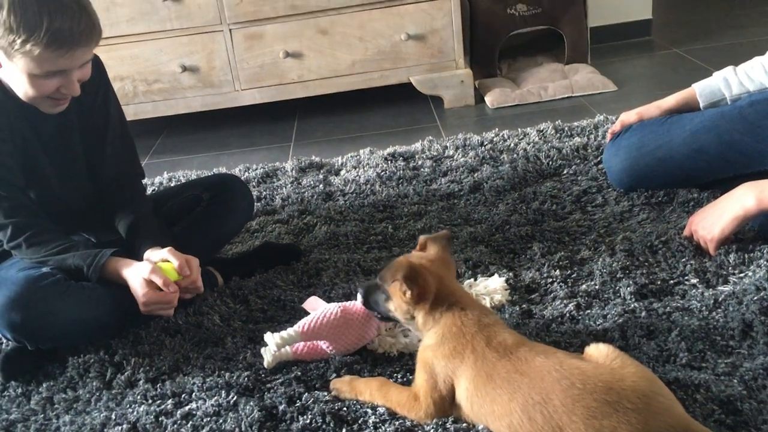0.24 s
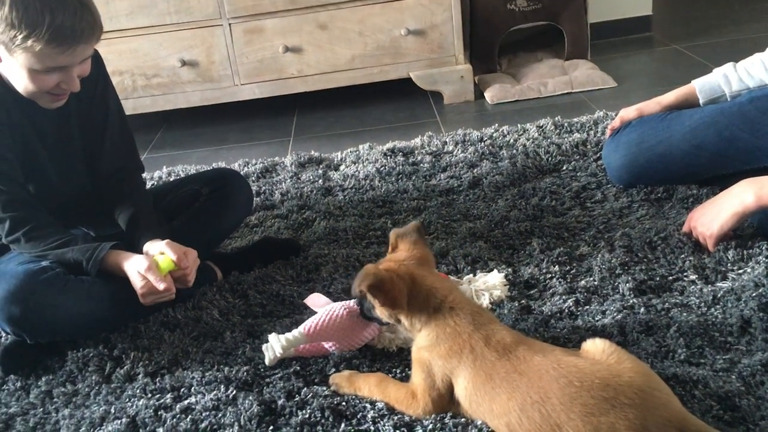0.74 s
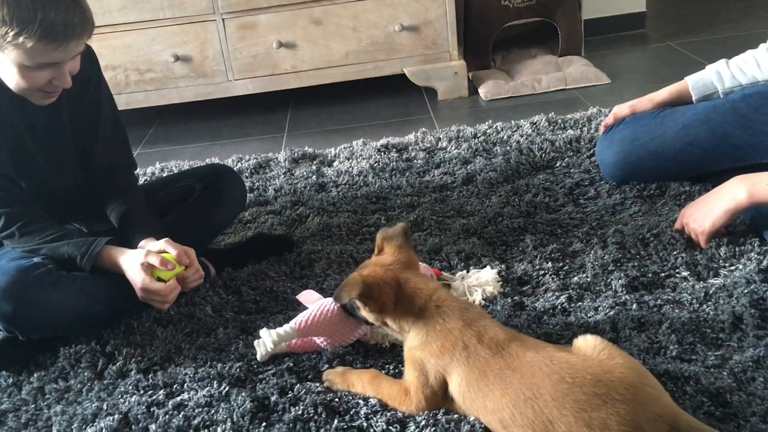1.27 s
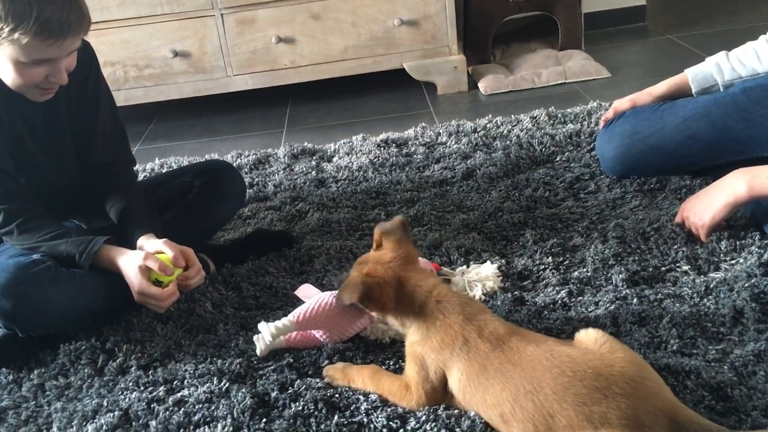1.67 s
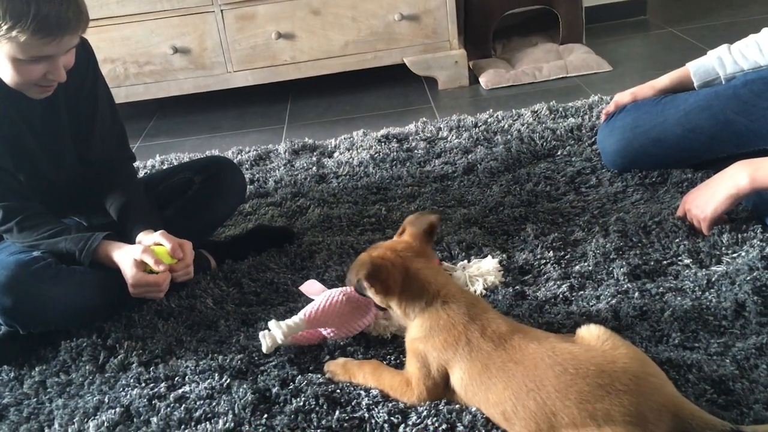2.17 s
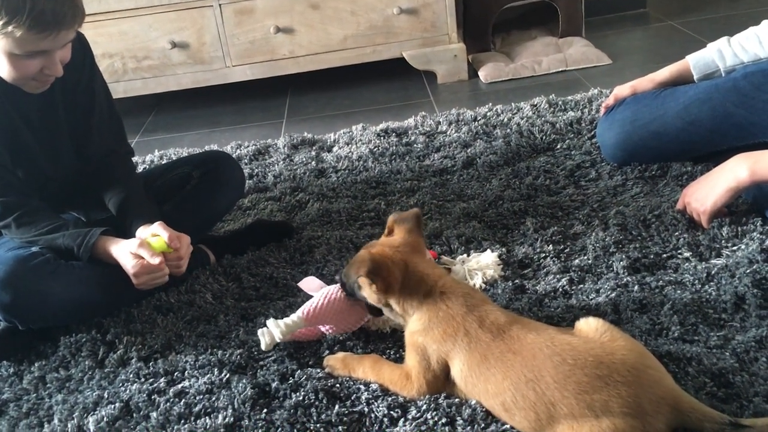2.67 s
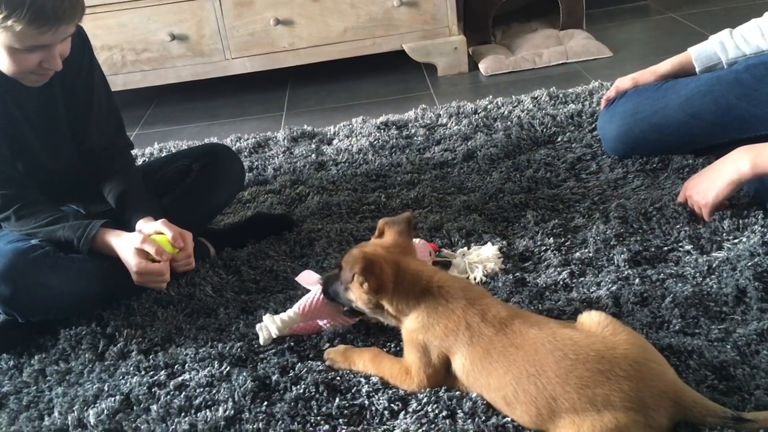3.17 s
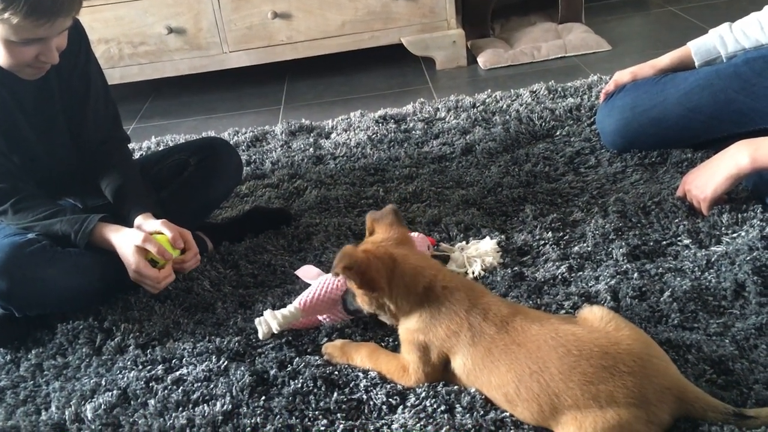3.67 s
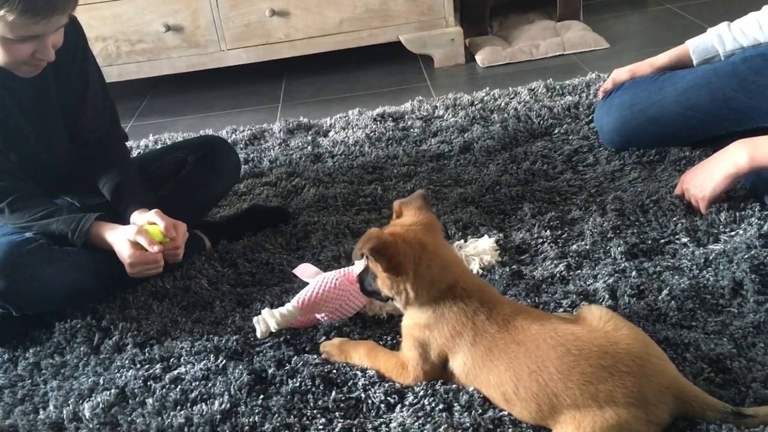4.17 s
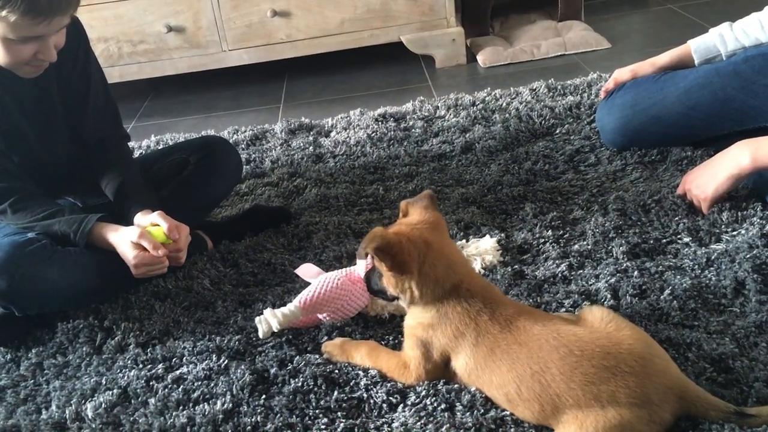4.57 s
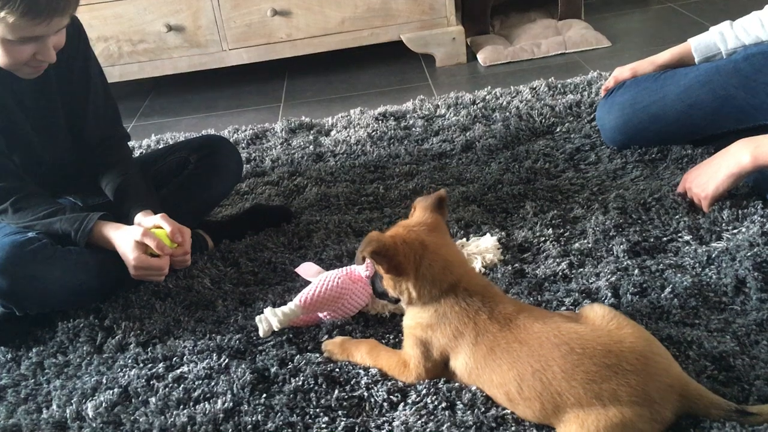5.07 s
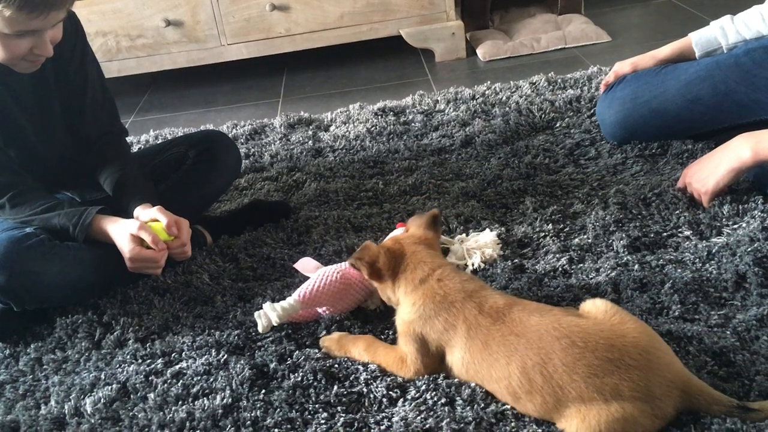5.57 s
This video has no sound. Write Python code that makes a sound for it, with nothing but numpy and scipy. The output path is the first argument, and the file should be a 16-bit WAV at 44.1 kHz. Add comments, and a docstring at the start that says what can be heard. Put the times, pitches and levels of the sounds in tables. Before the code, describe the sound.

A rubber squeaker ball is squeezed by hand six times, giving short bright squeaks with airy hisses over a steady low hum indoors.

```python
"""A living room with a rug, where a rubber squeaker ball is squeezed by hand six times.
Its reed starts with a chirp, locks into a bright squeak near 1.2 kHz and sags in pitch as the squeeze ends:
a stack of gliding overtones plus turbulence, with room reflections and a diffuse tail.
Around the squeaks, coloured noise makes the air hissing through the silent reed; two faint ticks are heard.
A steady mains hum and dull room noise lie under everything."""
import sys
import numpy as np
from scipy import signal
from scipy.fft import rfft, irfft, next_fast_len
from scipy.io import wavfile
from scipy.ndimage import map_coordinates

SR = 44100
rng = np.random.default_rng(int(sys.argv[2]) if len(sys.argv) > 2 else 0)


def waveform_to_disk(signal):
    """Save audio, clipped to [-1, 1], as 16-bit WAV at the path in sys.argv[1]."""
    frames = np.transpose(np.atleast_2d(signal))
    scaled = np.clip(frames, -1, 1) * 32767
    samples = np.round(scaled).astype(np.int16)
    wavfile.write(sys.argv[1], SR, samples)


N = 256662
TIME = np.arange(N) / SR

# The six squeezes of the hand on the ball.
# Each row: start, rise, hold and sag in seconds, the reed's free note, first pitch and top pitch in Hz,
# level in dB before the mix, brightness in dB (upper against lower overtones),
# then the notch cut by the cupped hands: centre in Hz, width in Hz, depth in dB.
SQUEEZES = [(1.229, 0.21, 0.0014, .021, 1932, 1235, 1278, -29, 0.5, 6900, 1400, 16),
            (2.357, 0.048, 0.0043, .075, 1714, 1203, 1229, -27, 4.5, 6600, 916, 1.5),
            (3.53, 0.0079, 0.0043, 0.02, 1920, 1204, 1248, -30, 4, 6800, 1780, 17),
            (3.948, 0.013, 0.0025, .092, 1762, 1209, 1239, -26, 5, 6400, 1102, 6.5),
            (4.172, 0.023, .103, 0.088, 1625, 1180, 1207, -28, 1.9, 2080, 1093, 4.5),
            (5.31, 0.027, .009, .043, 1675, 1205, 1244, -26.5, 4, 10300, 1800, 4.5)]


def amp(db):
    """Decibels to an amplitude factor."""
    return 10 ** (np.asarray(db) / 20)


def unit(x):
    """x brought to rms 1."""
    return x / np.sqrt(np.mean(x ** 2) + 1e-20)


def along(points, hz):
    """Read a curve of (Hz, value) points on a log frequency axis."""
    point_hz, values = np.transpose(points)
    return np.interp(np.log(hz + 1), np.log(point_hz + 1), values)


def wobble(rate, size):
    """A smooth random curve of size samples, with rate knots a second."""
    knots = rng.standard_normal(int(size * rate / SR) + 4)
    return map_coordinates(knots, [np.arange(size) * rate / SR])


def filtered(x, response):
    """Filter x by a gain given as a function of frequency."""
    size = next_fast_len(N + SR // 2)
    spectrum = rfft(x, size) * response(np.fft.rfftfreq(size, 1 / SR))
    return irfft(spectrum, size)[..., :N]


def noise(spectrum):
    """Noise coloured by (Hz, dB) points, at rms 1."""
    white = rng.standard_normal(N)
    return unit(filtered(white, lambda hz: amp(along(spectrum, hz))))


def add(track, s, x):
    """Mix x into the track from time s on, trimming what falls outside."""
    start = round(s * SR)
    part = x[max(-start, 0):N - start]
    track[max(start, 0):][:len(part)] += part


def envelope(t, start, end, attack, release):
    """1 from start to end, with an exponential swell before and decay after."""
    return np.exp(np.minimum(t - start, 0) / attack - np.maximum(t - end, 0) / release)


def background(hum_db=-43, air_db=-54.0):
    """A nearly pure mains hum, barely wavering in level, over the dull noise of the room."""
    # Spectrum of the room air. Each row: frequency in Hz, relative level in dB per Hz.
    air_curve = [(20, -41), (30, -10.5), (39, 0.5), (60, -2), (100, 1.5), (160, -6.5), (250, -7),
                 (370, -13.5), (520, -10.5), (800, -14), (1350, -11.5), (2000, -22), (4800, -33.5),
                 (16000, -39.5)]
    hum_hz, waver_db = 100, 0.1
    hum_level = amp(hum_db + waver_db * wobble(12, N))
    hum = hum_level * np.sqrt(2) * np.sin(2 * np.pi * hum_hz * TIME)
    return hum + amp(air_db) * noise(air_curve)


def ticks(decay=0.001):
    """Tiny bright clicks from the handled toys: noise bursts that die away within milliseconds."""
    # The faint ticks. Each row: time in seconds, level in dB of the burst's start.
    tick_rows = [(2.951, -51), (2.978, -55)]
    blows = sum(amp(db) * (TIME >= s) * np.exp(-np.abs(TIME - s) / decay) for s, db in tick_rows)
    return blows * noise([(3000, -30), (7500, -15), (8600, 2), (11000, -6), (16000, -12)])


def airflow(cut_s=0.005):
    """Air too slow to sound the reed hisses in and out of the ball, and swells just before each squeak."""
    # Spectra of the high hiss and the lower rush. Each row: frequency in Hz, relative level in dB per Hz.
    hiss_curve = [(2000, -36), (7500, -21), (9000, -9.5), (10400, -12.5), (11400, -2), (12500, 0.5),
                  (13600, 1.5), (14300, -4), (15300, -4), (16000, -4)]
    rush_curve = [(1000, -32.5), (3000, -8), (3700, -3.5), (4600, -4), (5400, -6.5), (7600, -10),
                  (8900, -2), (9800, 1.5), (10400, -16), (11500, -2.5), (14000, -12.5), (16000, -12.5)]
    # Puffs through the silent reed. Each row: start and length in seconds, high hiss and lower rush in dB.
    puff_rows = [(0.106, 0.32, -60.5, -71), (.48, 0.22, -64, -65), (.96, 0.074, -72, -67),
                 (2.075, 0.29, -61.5, -76), (2.778, .3, -73, -77.5), (3.918, .003, -59, -79),
                 (5.29, .005, -64.5, -73)]
    attack_s, release_s = 0.011, 0.048
    lead_hiss_db, lead_rush_db = -70, -65.5
    lead_s = 0.06  # time for the swell before a squeak to grow by e
    flutter_db = 0.7
    hiss, rush = np.zeros(N), np.zeros(N)
    for s, length, hiss_db, rush_db in puff_rows:
        flow = envelope(TIME, s, s + length, attack_s, release_s)
        hiss += amp(hiss_db) * flow
        rush += amp(rush_db) * flow
    for s, *_ in SQUEEZES:
        flow = envelope(TIME, s, s, lead_s, cut_s)
        hiss += amp(lead_hiss_db) * flow
        rush += amp(lead_rush_db) * flow
    flutter = amp(flutter_db * wobble(27, N))
    return flutter * (hiss * noise(hiss_curve) + rush * noise(rush_curve))


def in_room(x, tail_db, walls_db, gap=0.00087):
    """x with six early reflections from floor and furniture and a diffuse tail that fades by frequency."""
    # Decay of the room. Each row: frequency in Hz, time to fall by 60 dB in seconds.
    decay_curve = [(1200, 0.64), (2500, 0.59), (5000, 0.5), (7700, 0.52), (11000, 0.37), (16000, 0.25)]
    hz, t, cells = signal.stft(rng.standard_normal(SR * 2 // 3), SR, nperseg=256)
    fade = amp(-60 * t / along(decay_curve, hz)[:, None])
    tail = signal.istft(cells * fade, SR, nperseg=256)[1]
    tail *= 1 - np.exp(-(np.arange(len(tail)) / SR / gap) ** 2)  # the tail builds up over the gap
    echo = amp(tail_db) * tail / np.linalg.norm(tail)
    bounces = rng.integers(SR // 400, SR // 50, size=6)  # 2.5 to 20 ms late
    echo[bounces] += amp(walls_db) * rng.standard_normal(size=6)
    echo[0] = 1  # the direct sound
    return signal.fftconvolve(x, echo)


def pressure(t, start, rise, hold, sag, first_hz, top_hz):
    """The hand's pressure rises, holds and runs out; gives the pitch Hz, level dB and brightness dB it drives."""
    # The hand eases for a moment inside the two long squeezes.
    # Each row: time and half-length in seconds, pitch drop in Hz, level drop in dB.
    easing_rows = [(1.357, 0.056, 48, 3), (4.26, 0.017, 20, 1.5)]
    stall_hz = 1129.2  # the pitch at which the reed stops as the pressure runs out
    sag_skew = 1.17  # above 1 the pressure lingers before it falls
    sag_db, sag_dull_db = 7, 3.5  # level and brightness lost by the stall
    rise_dull_db = 3  # brightness still to gain when the reed first speaks
    lacking = np.clip(1 - (t - start) / rise, 0, 1) ** 2
    sagged = np.clip((t - start - rise - hold) / sag, 0, 1)
    spent = np.sin(np.pi / 2 * sagged ** sag_skew) ** 2
    pitch = top_hz + (first_hz - top_hz) * lacking + (stall_hz - top_hz) * spent
    level = -sag_db * spent
    for s, half, drop_hz, drop_db in easing_rows:
        eased = np.exp(-((t - s) / half) ** 2)
        pitch = pitch - drop_hz * eased
        level = level - drop_db * eased
    bright = -rise_dull_db * lacking - sag_dull_db * spent
    return pitch, level, bright


def squeak(row, lead=0.015, swell=0.0048, early=0.0011, pull=0.00046, release=0.0027,
           jitter=0.0014, flutter_db=0.39, air_db=-34):
    """One squeeze: the reed swings freely, then slaps shut once a cycle. Returns (start s, sound)."""
    # Colour of the reed and the squeaker's tube. Each row: frequency in Hz, relative level in dB.
    reed_curve = [(1200, -5), (2450, -2), (3700, 1.5), (4900, -2.5), (6100, -2), (7400, -6.5), (8700, -3),
                  (9900, -2.5), (11100, -6), (12400, -1), (13600, -7.5), (15000, -13), (16000, -15.5)]
    start, rise, hold, sag, free_hz, first_hz, top_hz, level_db, bright_db, centre, width, depth = row
    end = start + rise + hold + sag
    t = np.arange(start - lead, end + 5 * release, 1 / SR)
    age = t - start
    pitch, level, bright = pressure(t, start, rise, hold, sag, first_hz, top_hz)

    # the reed starts on its own higher note and is pulled down as its swing grows
    freedom = 1 / (1 + np.exp(np.minimum((age + early) / pull, 20)))
    pitch = pitch + (free_hz - pitch) * freedom
    pitch = pitch * (1 + jitter * wobble(250, len(t)))
    blow = amp(level_db + level) * envelope(t, start, end, swell, release)
    blow = blow * np.clip(2 * (age + lead) / lead, 0, 1)  # the swing grows from rest

    # the slaps give a full stack of overtones, coloured by the squeaker's tube and the hands
    k = np.arange(1, 15)[:, None]
    hz = k * pitch
    notch_db = depth * np.exp(-0.5 * ((hz - centre) / width) ** 2)
    gains = amp(along(reed_curve, hz) - notch_db) * (hz < SR / 2)

    # harder blowing shuts the reed more sharply and lifts the upper overtones
    low = np.linalg.norm(gains[:4], axis=0)
    high = np.linalg.norm(gains[6:], axis=0)
    lift = amp(bright_db + bright) * low / high
    gains = gains / low * lift ** np.clip((k - 3) / 4, 0, 1)

    # overtones appear only once the reed reaches its seat, the highest last; each flutters a little
    contact = 1 / (1 + np.exp(-age / 0.00055))
    flutter = amp(flutter_db * np.array([wobble(73, len(t)) for _ in k]))
    gains = gains * contact ** np.log10(k) * flutter
    phase = 2 * np.pi * np.cumsum(pitch) / SR
    overtones = gains * np.cos(k * phase + rng.normal(0, 0.88, k.shape))
    stack = np.sqrt(2) * np.sum(overtones, axis=0)
    turbulence = amp(air_db) * np.diff(rng.standard_normal(len(t) + 1))
    return t[0], blow * (stack + contact * turbulence)


def ball(squeak_db=-1.0, earlier_db=-5, tail_db=-8.0, walls_db=-19):
    """The six squeaks in the room, after the dying ring of an earlier one."""
    out = np.zeros(N)
    for row in SQUEEZES:
        start, sound = squeak(row)
        add(out, start, amp(squeak_db) * in_room(sound, tail_db, walls_db))
    earlier = squeak(SQUEEZES[-1])[1]
    add(out, -0.27, amp(earlier_db) * in_room(earlier, tail_db, walls_db))
    return out


def scene():
    """One microphone feeds both channels."""
    mono = background() + ticks() + airflow() + ball()
    return np.array([mono, mono])


def record(dry):
    """The recorder keeps nothing above its band limit, a 200 Hz wide slope."""
    top_hz = 15800
    return filtered(dry, lambda hz: np.clip((top_hz - hz) / 200 + 0.5, 0, 1))


dry = scene()
out = record(dry)
waveform_to_disk(out)
```